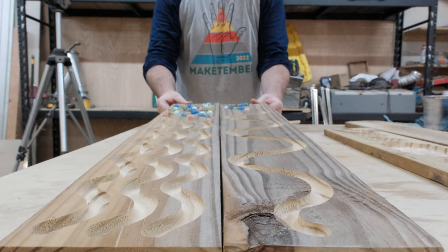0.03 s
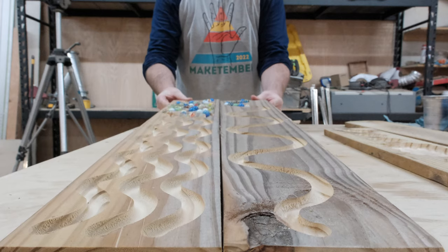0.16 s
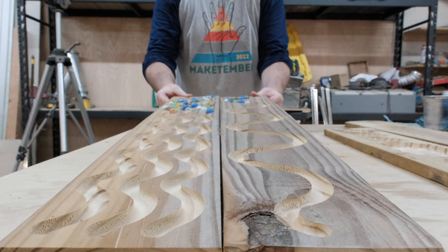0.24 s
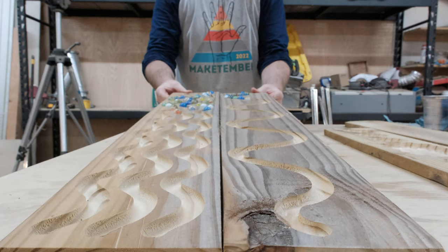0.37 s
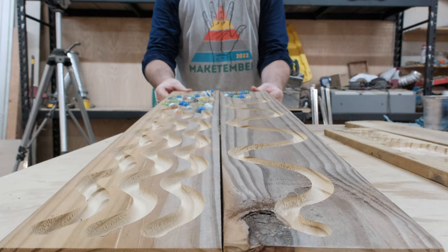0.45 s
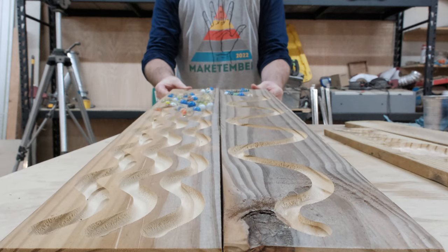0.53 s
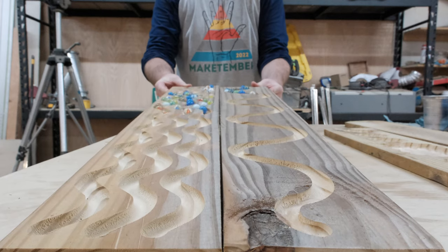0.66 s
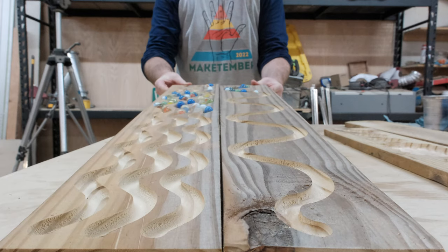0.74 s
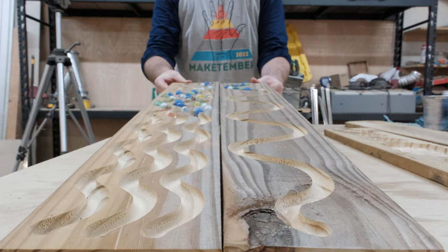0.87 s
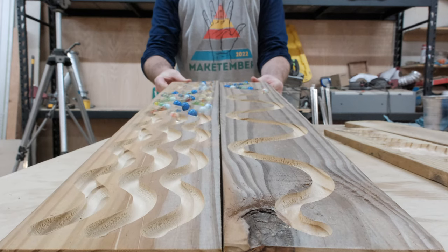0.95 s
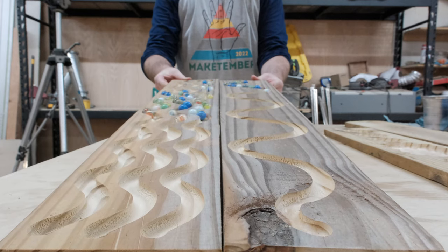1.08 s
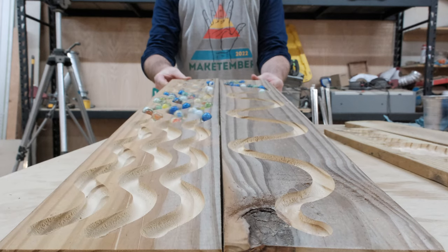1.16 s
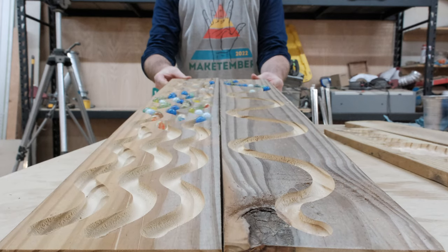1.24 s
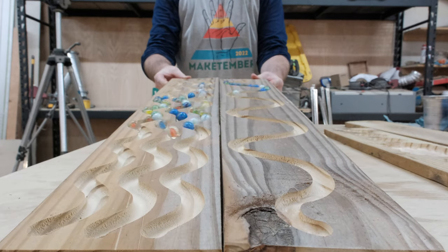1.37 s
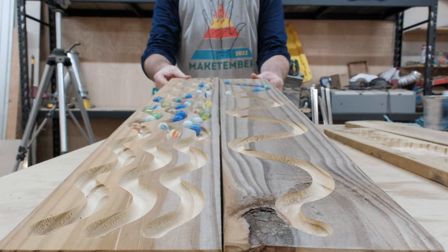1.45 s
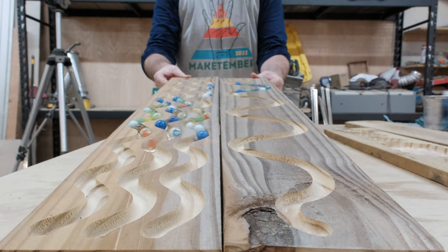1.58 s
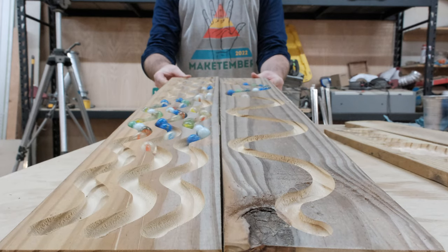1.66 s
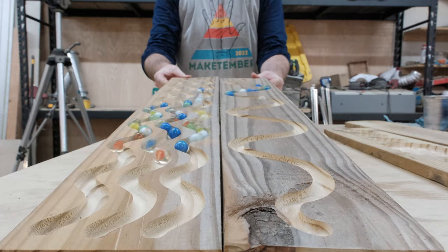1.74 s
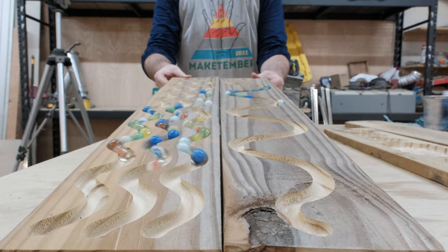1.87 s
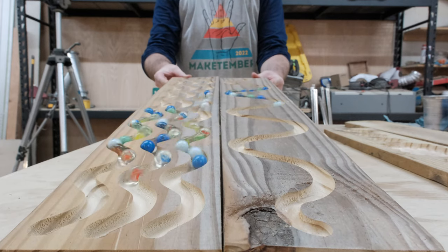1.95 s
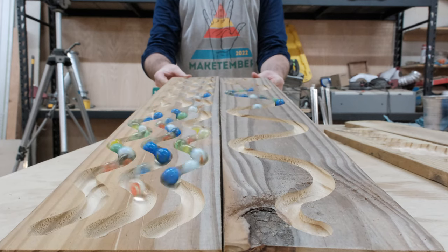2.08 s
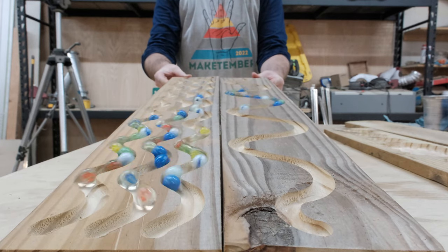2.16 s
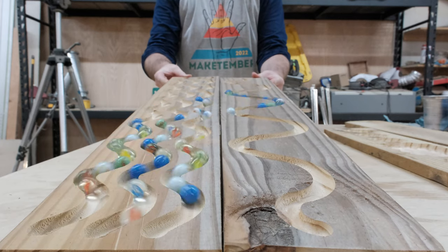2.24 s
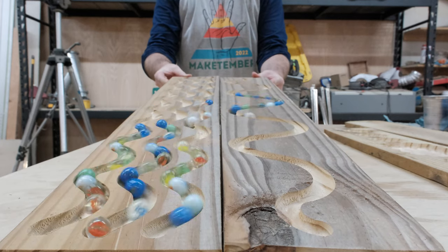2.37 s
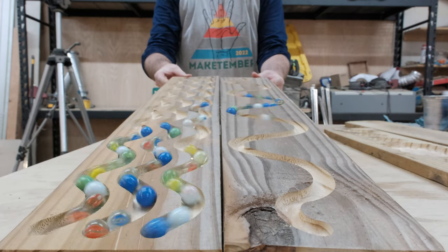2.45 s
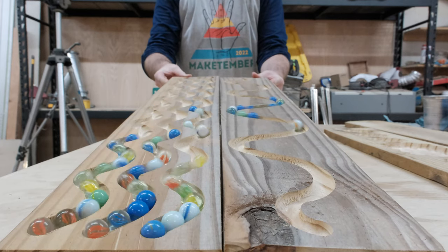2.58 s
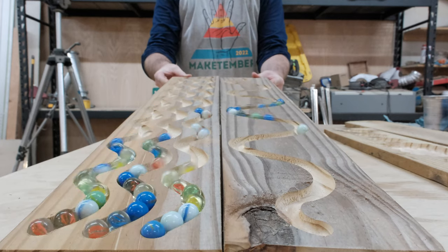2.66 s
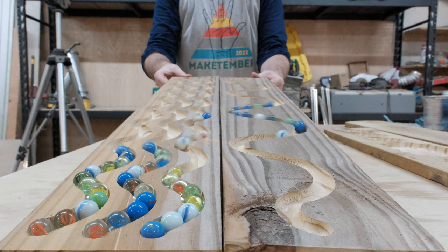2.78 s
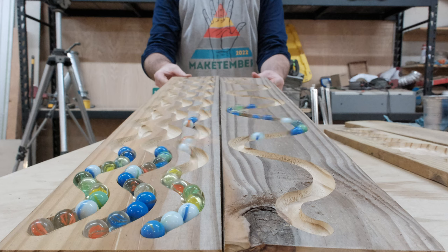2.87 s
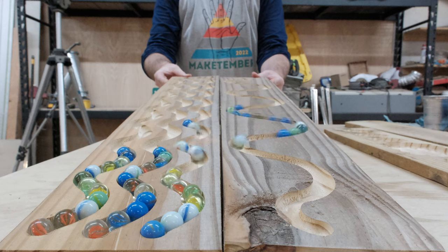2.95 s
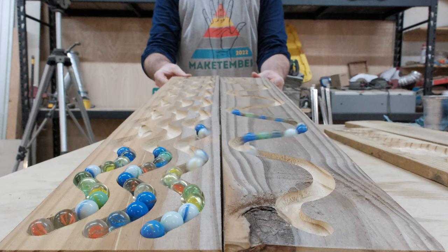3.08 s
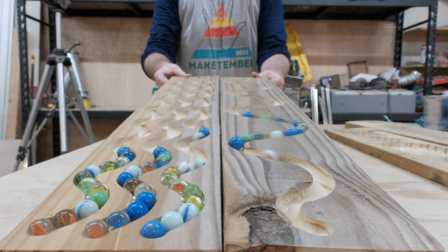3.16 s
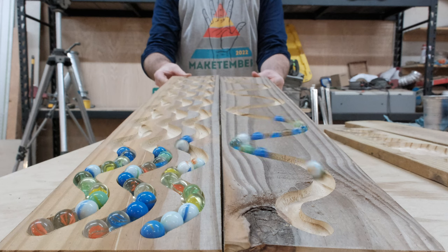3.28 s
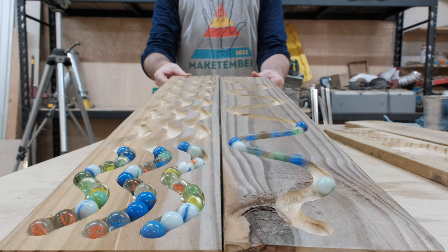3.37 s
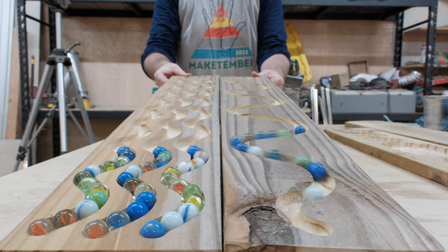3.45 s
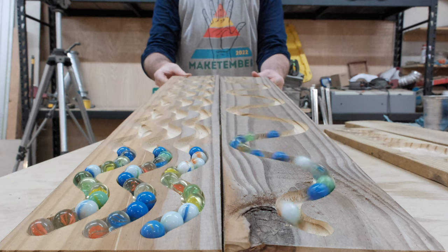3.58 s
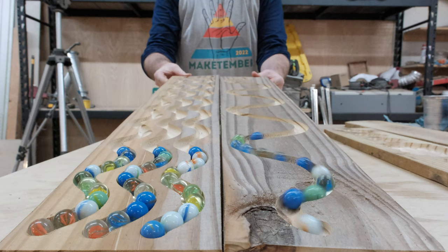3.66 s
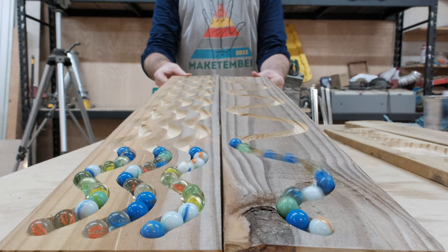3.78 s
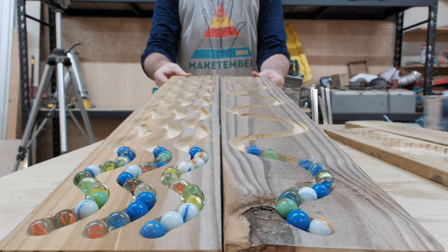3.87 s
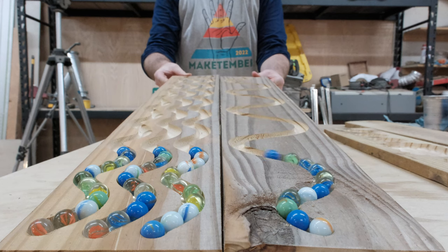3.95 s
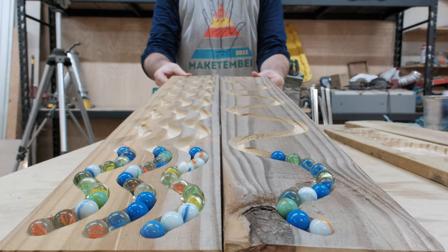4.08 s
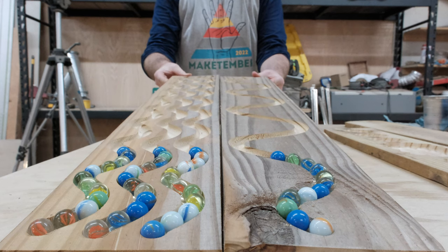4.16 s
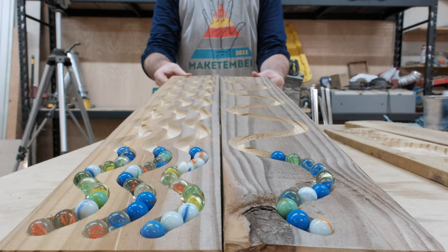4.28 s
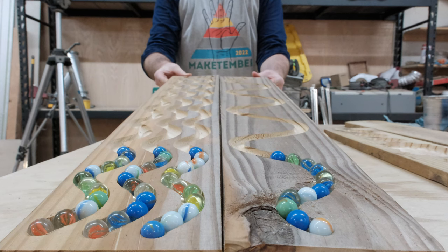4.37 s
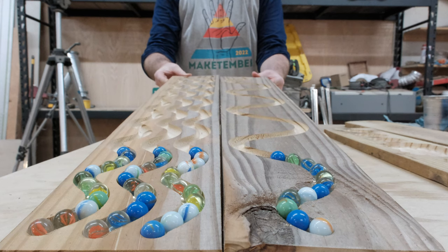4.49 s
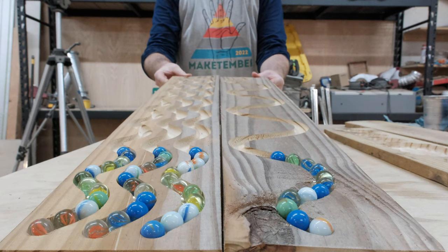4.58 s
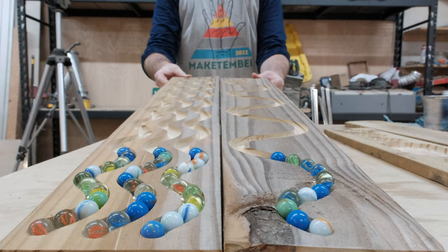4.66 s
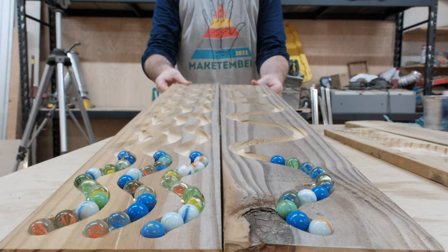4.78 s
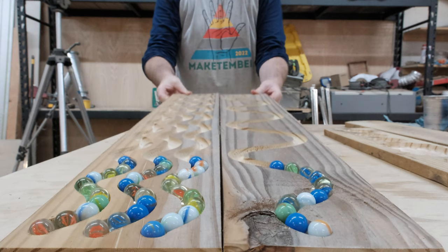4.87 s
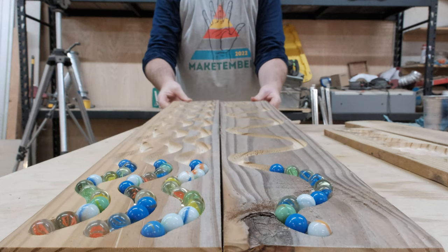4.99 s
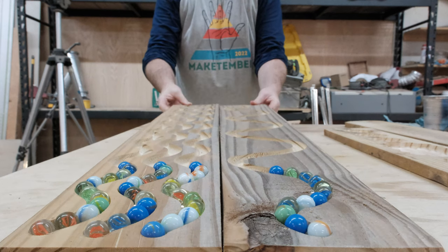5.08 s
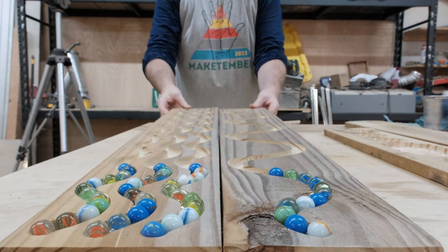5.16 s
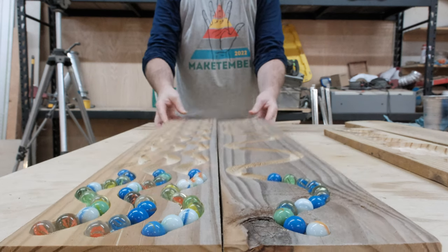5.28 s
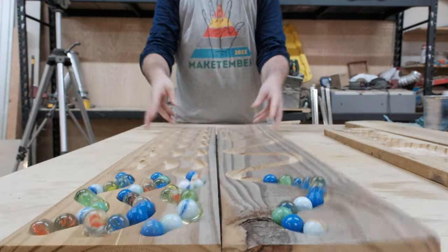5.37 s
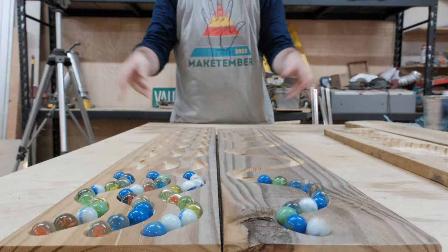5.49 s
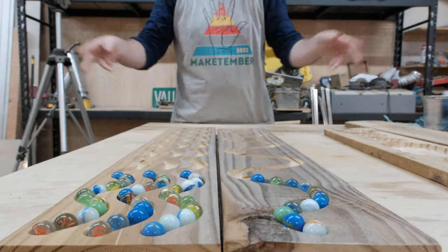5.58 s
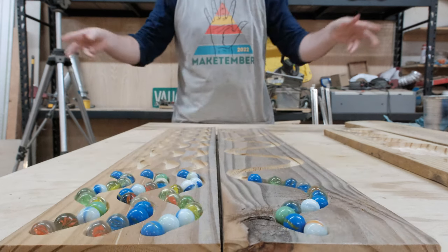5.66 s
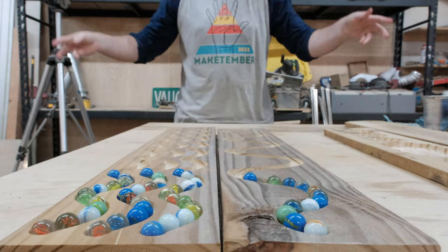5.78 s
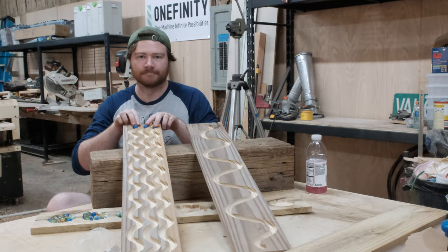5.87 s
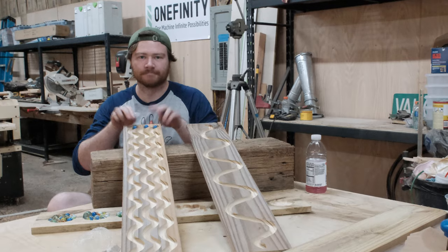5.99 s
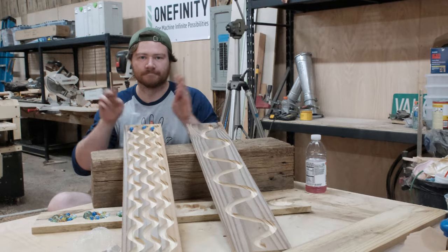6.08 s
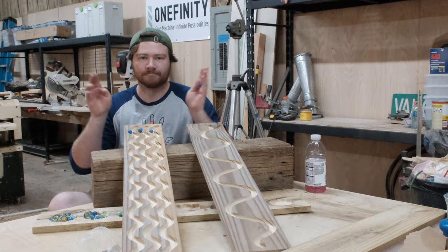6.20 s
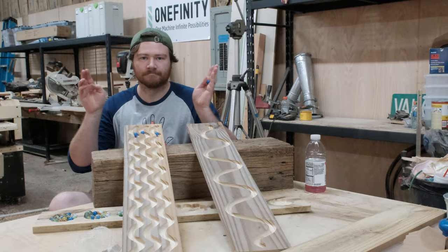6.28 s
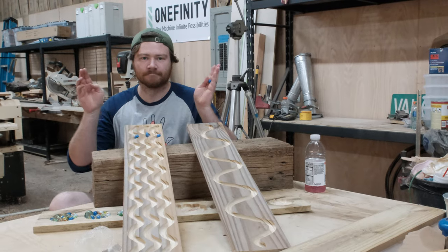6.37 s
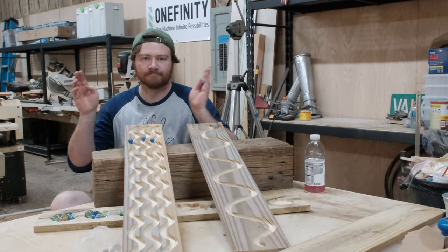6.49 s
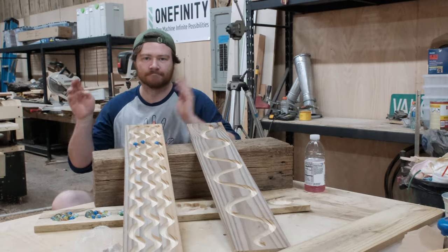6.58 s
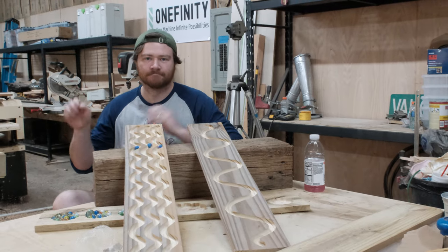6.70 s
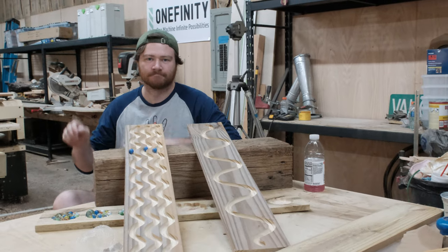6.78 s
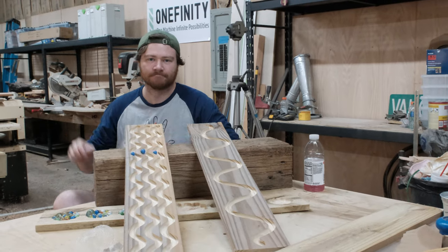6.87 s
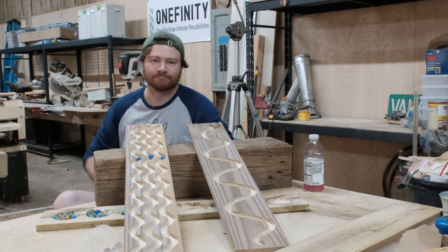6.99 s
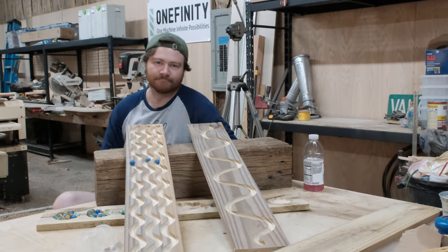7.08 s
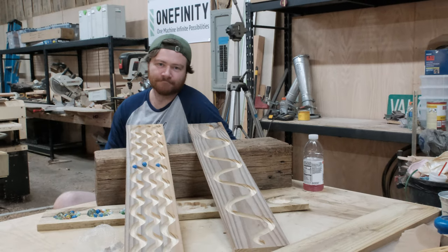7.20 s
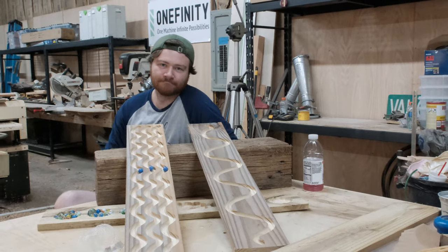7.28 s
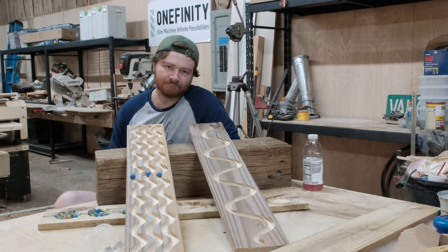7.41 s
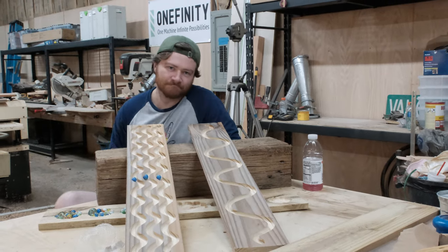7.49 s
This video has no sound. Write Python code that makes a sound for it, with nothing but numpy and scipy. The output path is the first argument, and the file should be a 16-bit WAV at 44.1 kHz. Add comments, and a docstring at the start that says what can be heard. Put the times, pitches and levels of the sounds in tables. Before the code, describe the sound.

Glass marbles rattle down grooved wooden boards and click into piles, the boards clack flat on a bench, then fainter marbles knock down another board.

```python
"""Quiet workshop: glass marbles roll down grooves of two tilted wooden boards close by, clicking as they pile up.
Hands shift the boards, which drop flat on the bench and shake the marbles; then a second scene:
three marbles knock their way down a board farther off. Board sound is noise and blows ringing wood modes;
clicks are short snaps with scatter; the drop is a board crack over decaying bench modes. Filtered noise and
thin tones form the background; decaying noise is the room's answer."""
import sys
import numpy as np
from scipy import signal
from scipy.fft import rfft, irfft, next_fast_len
from scipy.io import wavfile

SR = 44100
rng = np.random.default_rng(int(sys.argv[2]) if len(sys.argv) > 2 else 0)


def waveform_to_disk(signal):
    """Save audio, clipped to [-1, 1], as 16-bit WAV at the path in sys.argv[1]."""
    frames = np.transpose(np.atleast_2d(signal))
    scaled = np.clip(frames, -1, 1) * 32767
    samples = np.round(scaled).astype(np.int16)
    wavfile.write(sys.argv[1], SR, samples)


N = 332514

# rolling on the near boards: time_s, level_db
NEAR_ROLL = [(0, -41), (.13, -35), (.48, -23.5), (.66, -21.5), (.9, -25), (1.25, -18), (1.55, -17.5),
             (1.8, -13.5), (2.0, -15), (2.3, -19.5), (2.52, -26), (2.63, -20.5), (2.78, -29), (3.05, -20.5),
             (3.23, -27), (3.45, -21), (3.6, -23), (3.75, -22.5), (3.87, -30.5), (3.94, -37.5),
             (4.005, -32.5), (4.03, -65.5)]
# rolling on the far board: time_s, level_db
FAR_ROLL = [(5.9, -76), (6.146, -43.5), (6.332, -41.5), (6.716, -40.5), (6.886, -38), (7.046, -39),
            (7.54, -34)]
# knocks on the near boards: marbles while tilted, then the boards' landing and the shaken marbles:
# start_s, level_db (before lift), hardness_db (treble)
NEAR_KNOCKS = [(0.0959, -16.5, -33), (0.245, -8, -21), (0.304, -15, -22), (0.35, -12, -26),
               (0.4114, -12, 6), (0.456, -10.5, -33), (0.495, -11.5, 0), (0.571, -10, -14.5),
               (0.587, -7.5, -15.5), (0.6707, -8.5, -16), (0.6967, -11.5, -18.5), (0.7114, -10.5, -26),
               (0.776, -8, -19), (0.843, -12, -22), (0.9271, -13.5, -8), (0.9442, -11, -9),
               (0.9535, -8.5, -19.5), (0.9993, -12.5, -14), (1.1098, -11, -6), (1.087, -9, -19),
               (1.1368, -5.5, -10), (1.1979, -13, -8.5), (1.2389, -6, -13), (1.3187, -7, -17.5),
               (1.3481, -13, -5), (1.4911, -15.5, -12.5), (1.5715, -7.5, -11), (1.6018, -9, -9.5),
               (1.626, -5, -18.5), (1.718, -3, -21.5), (1.8145, -15.5, -14.5), (1.873, -11, -7.5),
               (2.0573, -5, -15), (2.1762, -6.5, -22.5), (2.2556, -8.5, -26.5), (2.366, -0.5, -18.5),
               (2.3952, -12.5, -16.5), (2.4878, -7, -11.5), (2.4978, -3, 4.5), (2.8667, -15, -12),
               (2.906, -14, -9), (2.932, -6.5, -17), (3.0147, -15, -19.5), (3.0477, -15, -22),
               (3.273, -10, -20.5), (3.336, -11, -7.5), (3.3613, -9.5, -5.5), (3.41, -21.5, -12),
               (3.457, -10, -20.5), (3.6448, -11, -9.5), (3.662, -8, -13), (3.7294, -4, -13.5),
               (3.7409, -7.5, -22.5), (3.8079, -9.5, -5.5), (3.821, -7, -1.5), (4.8913, -39.5, -49.5),
               (5.146, -38.5, -10), (5.3376, 0, -14.5), (5.348, -13, -24), (5.3972, -7, -5.5),
               (5.4274, -14, -4), (5.4503, -12.5, -8), (5.4826, -7.5, -17), (5.5206, -16, -4),
               (5.5752, -22, -13)]
# marbles knock far groove walls: start_s, level_db (before lift), hardness_db (treble)
FAR_KNOCKS = [(6.1484, -34, -18), (6.1892, -26.5, -21), (6.2315, -20.5, -18), (6.335, -19, -25),
              (6.3777, -19.5, -18), (6.407, -25.5, -14), (6.478, -27.5, -24), (6.545, -23, -27),
              (6.5655, -22, -18), (6.583, -25, -20), (6.6398, -19.5, -14), (6.6521, -15, -27),
              (6.694, -16, -17), (6.7073, -13, -25), (6.722, -17.5, -25), (6.7578, -20, 3),
              (6.786, -24, -24), (6.8619, -15.5, -26), (6.8926, -30, -23), (6.918, -25, -28),
              (6.9477, -27, -33), (6.9596, -15, -25), (6.968, -15, -14), (6.9877, -14.5, -27),
              (7.003, -15, -9), (7.045, -20.5, -28), (7.0653, -17.5, -12.5), (7.1104, -17.5, -22),
              (7.1269, -14.5, -5), (7.171, -25, -11), (7.241, -21, -17), (7.2838, -15, -25),
              (7.3112, -23.5, -26), (7.3219, -17, -13), (7.358, -15, 7), (7.375, -16, -7),
              (7.3902, -17, -11), (7.4535, -17, 4), (7.493, -19.5, -8)]
# glass meets glass: start_s (before a fixed offset), level_db (before trim)
GLASS_CLICKS = [(0.1446, -30), (0.177, -25), (0.186, -25.5), (0.2007, -26), (0.375, -28), (0.398, -28.5),
                (0.5302, -29), (0.5463, -21), (0.628, -22.5), (0.6973, -24), (0.8058, -20.5),
                (0.831, -22.5), (0.8869, -21.5), (0.9906, -26), (1.065, -15.5), (1.0972, -16),
                (1.1563, -13), (1.2502, -17), (1.265, -21.5), (1.368, -17), (1.387, -14), (1.4082, -20.5),
                (1.6663, -13.5), (1.7071, -11.5), (1.8078, -20), (1.8516, -12), (1.9298, -17.5),
                (2.0067, -13.5), (2.0352, -14), (2.0565, -14.5), (2.1136, -16), (2.4585, -15),
                (2.4687, -10), (2.4933, -8.5), (2.5434, -20), (2.56, -12), (2.5953, -8), (2.6174, -9.5),
                (2.632, -18), (2.649, -9), (2.654, -7.5), (2.6688, -13.5), (2.68, -5), (2.6887, -9),
                (2.7067, -8.5), (2.7205, -7), (2.7583, -9.5), (2.7917, -8), (2.814, -6), (2.8174, -11.5),
                (2.835, -10.5), (2.8868, -7), (2.9147, -15), (3.055, -23), (3.1423, 3), (3.1612, -19),
                (3.1716, -12), (3.481, -2), (3.4876, -5.5), (3.5444, -25.5), (3.5603, -20.5), (3.597, -14),
                (3.6185, -15), (3.7532, -17), (3.7727, -3.5), (3.785, -14), (3.812, -6), (3.8225, -3),
                (3.8505, -7), (3.8623, -6), (3.8687, -10.5), (3.8716, -13), (3.897, -6), (3.9078, -9.5),
                (3.9689, -1), (3.9933, -13), (4.013, -33), (5.3348, -14.5), (5.345, -19), (5.3994, -22),
                (5.4276, -18), (5.4944, -26), (5.5234, -36), (5.6127, -35), (5.6506, -43), (5.6735, -40),
                (5.6984, -39), (5.7473, -35), (5.827, -31)]
# modes of the tilted near boards: pitch_hz, width_hz, level_db
TILTED_MODES = [(153, 20, -2), (245, 32, -5), (557, 110, -2), (756.5, 55, 4.5), (913, 75, 2.5),
                (1050, 48, 4), (1187, 53, 8.5), (1307, 31, 5), (1531.4, 67, 9.5), (1910, 89, 4),
                (2006, 630, -4), (2420, 54, 0), (2928, 160, -11.5), (3250, 140, -19.5), (3734, 150, -43.5)]
# modes of the near boards damped by the bench: pitch_hz, width_hz, level_db
LYING_MODES = [(250, 120, -4), (600, 250, -4), (950, 350, -3), (1450, 450, 0), (2100, 500, -3),
               (3000, 700, -8), (4200, 1300, -16)]
# modes of the far board: pitch_hz, width_hz, level_db
FAR_MODES = [(238, 12.6, 8), (382, 11.3, 8), (500, 16, 7), (796, 52, 7.5), (1035.5, 8.3, 13.5),
             (1196, 21, 5.5), (1287, 54, 9), (1570, 76, 2.5), (1928, 64, 1), (2364, 186, -7),
             (2825, 175, -10.5), (3375, 70, -13), (3990, 200, -27), (6540, 900, -31.5)]
# marbles run into the queue: center_s, half_length_s, patter_db
PILE_UPS = [(2.65, 0.073, -28.5), (3.875, 0.044, -30), (3.997, 0.0074, -43)]
# bench modes: pitch_hz, level_db (before drop level), t60_s
BENCH_MODES = [(408, 12, 0.0096), (680, 18, 0.0044)]
# hands shift the boards: start_s, hold_s, fall_s (for about 9 dB), level_db
SCUFFS = [(4.825, .035, .015, -49), (5.15, .025, .035, -47), (5.288, .027, .005, -34)]
# room decay: frequency_hz, t60_s
ROOM_DECAY = [(200, 0.75), (1500, 0.73), (5000, 0.81), (12000, 0.21)]
# room noise spectrum: frequency_hz, density_db (relative, per Hz)
AIR_SPECTRUM = [(15, -37), (25, -6), (163, 1), (800, -4.5), (1600, -13.5), (14800, -25.5), (16500, -32.5)]
# tones of lamps and a fan: pitch_hz, level_db (rms)
HUM_TONES = [(452, -71.5), (872, -66), (1082, -74.5), (1680, -73.5), (6358, -82.5)]

# fingers put three marbles on the far board: start_s, level_db (before lift), hardness_db
SET_DOWN = (5.944, -35, -80)
# light knocks: level_db over the rolling (before lift), spread_db, softest hardness_db
RATTLE_NEAR = (2, 2, -25)
RATTLE_FAR = (4, 2.5, -31)
# rocking after the drop: start_s, hold_s, level_db
SHAKE = (5.39, 0.12, -24.5)
SHAKE_RISE_S, SHAKE_FALL_S = 0.043, 0.03  # for about 9 dB
SHAKE_PATTER_DB = -21  # glass contacts, relative to the rocking
# boards land: start_s, level_db
DROP_S, DROP_DB = (5.3372, 3)
# scene change: start_s, fade_in_s
CHANGE_S, FADE_IN_S = (5.862, 0.073)
# room noise in each scene: level_db (rms)
NEAR_AIR_DB, FAR_AIR_DB = [-60, -58.5]
# dry tap band: low_hz, high_hz
TAP_BAND_HZ = (1800, 4200)
TAP_FALL_S, TAP_DB_PER_HARDNESS_DB = 0.004, 0.4
CONTACT_HALF_S = 0.000079  # at reference hardness
FAR_SKID_S = 0.007  # short skids on the steep board
PATTER_DB, PATTER_POWER = -41.5, 0.57  # small glass contacts swing less than the rolling
SCUFF_RISE_S, SCUFF_RUB_DB = 0.011, -5.5  # rise for about 9 dB; rub relative to scuff gain
GLASS_ROOM_DB = -31
TOP_HZ = 16300


def rolling(modes, rate_hz, smooth_db, soft_hz):
    """Tool marks jolt marbles over a smooth rumble; each jolt shares out anew among the wood modes."""
    out = 0
    marks = unit(bumps(rate_hz, spread_db=1.5))
    for hz, width_hz, db in modes:
        # heavy low modes feel mostly the rumble
        drive = min(hz / 1500, 1) * marks + amp(smooth_db)
        jolts = drive * rng.standard_normal(N)
        pole = np.exp((-np.pi * width_hz + 2j * np.pi * hz) / SR)
        ring = unit(signal.lfilter([1], [1, -pole], jolts).imag)
        out = out + amp(db) * np.sqrt(width_hz) * ring
    # wood yields under glass: contact too slow for the treble
    return unit(filtered(out, lambda hz: 1 / (1 + 1j * hz / soft_hz) ** 2))


def knocks(events, modes, lift_db, soft_db, skid_s, skid_db, tap_db):
    """A blow and short skid ring the board over a dry tap; harder contact is briefer and favors high modes."""
    out = np.zeros(N)
    t = np.arange(SR // 14) / SR
    skid_t = t[:SR // 40]
    hz, width_hz, level_db = np.transpose(modes)[..., None]
    octaves = np.log2(hz / 1400)
    fades = width_hz * np.exp(-np.pi * width_hz * t)
    spots = rng.standard_normal((len(events), 3, len(modes), 1))
    skids = rng.standard_normal((len(events), SR // 40))
    tap_filter = signal.butter(5, TAP_BAND_HZ, "band", fs=SR, output="sos")
    taps = signal.sosfilt(tap_filter, skids[:, ::-1] * np.exp(-skid_t / TAP_FALL_S))
    for (s, db, hardness_db), (spot, side, load), jolts, tap in zip(events, spots, skids, taps):
        hard_db = hardness_db - soft_db
        treble_db = 0.71 * hard_db * np.clip(octaves, 0, 1)
        bass_db = np.clip(1.6 * hard_db, 0, 9) * np.clip(octaves, -3, 0)
        # marbles on the board shift its modes a little
        rings = fades * np.sin(2 * np.pi * hz * (1 + 0.015 * load) * t)
        strengths = np.sign(side) * amp(level_db + 3.5 * spot + treble_db + bass_db)
        ring = np.sum(strengths * rings, axis=0)
        contact_t = np.arange(-15, 16) / SR
        contact = np.exp(-(contact_t / CONTACT_HALF_S * amp(0.12 * hard_db)) ** 2)
        force = np.append(1, amp(skid_db) * jolts * np.exp(-skid_t / skid_s))
        ring = signal.fftconvolve(ring, np.convolve(force, contact))
        tap_gain = amp(db + tap_db + TAP_DB_PER_HARDNESS_DB * hard_db)
        add(out, s, amp(db + lift_db) * ring / np.max(np.abs(ring)))
        add(out, s, tap_gain * tap / np.max(np.abs(tap)))
    return out


def rattle(roll, over_db, spread_db, soft_db, count):
    """Light knocks at chance moments follow the rolling level, mostly small."""
    s, db = np.transpose(roll)
    draw = rng.random((count, 3))
    when_s = s[0] + draw[:, 0] * (s[-1] - s[0])
    extra_db = over_db - spread_db * np.log(draw[:, 1] + 0.038)
    level_db = np.interp(when_s, s, db) + extra_db
    return list(zip(when_s, level_db, soft_db + 9 * draw[:, 2]))


def radiated(x, edge_hz):
    """A narrow board pushes little air in the bass."""
    return filtered(x, lambda hz: (1j * hz / (1j * hz + edge_hz)) ** 3)


def tilted_boards(roll, scuffs):
    """Rolling, scuffs and knocks ring the near boards before they land."""
    sound = (roll + scuffs) * rolling(TILTED_MODES, 200, smooth_db=-4.0, soft_hz=5925)
    blows = [k for k in NEAR_KNOCKS if k[0] < DROP_S - 0.01]
    blows += rattle(NEAR_ROLL, *RATTLE_NEAR, count=200)
    sound = sound + knocks(blows, TILTED_MODES, lift_db=1.52, soft_db=-32,
                           skid_s=0.0073, skid_db=-25.5, tap_db=-18.5)
    return radiated(sound, edge_hz=228)


def lying_boards(shake):
    """The landing crack, rocking marbles and their knocks ring the near boards, damped by the bench."""
    sound = shake * rolling(LYING_MODES, 300, smooth_db=-8, soft_hz=3440)
    blows = [k for k in NEAR_KNOCKS if k[0] > DROP_S - 0.01]
    sound = sound + knocks(blows, LYING_MODES, lift_db=3.5, soft_db=-18,
                           skid_s=0.0077, skid_db=-16.5, tap_db=-22)
    return radiated(sound, edge_hz=85)


def click(hz, echoes, weight):
    """Air squeezed between marbles snaps and scatters; a heavy blow (weight 0-1) fills in a lower body."""
    t = np.arange(-20, 20) / SR
    snap = np.exp(-(t / 0.00018) ** 2) * np.sin(2 * np.pi * hz * t)
    edge = 0.42 * np.exp(-(t / 0.00009) ** 2) * np.sin(2 * np.pi * 12000 * t)
    # marbles shoved into the wood
    body = 0.84 * weight * np.exp(-(t / 0.00016) ** 2) * np.sin(2 * np.pi * 3800 * t)
    # returned by the wood and the next marbles
    scatter = 0.066 * echoes * np.exp(-np.arange(len(echoes)) / SR / 0.002)
    return np.convolve(snap + edge + body, np.append(1, scatter))


def glass(patter, crowd):
    """Clear clicks at individual pitches over small contacts that thicken where marbles crowd."""
    out = np.zeros(N)
    pitches_hz = rng.normal(7270, 500, len(GLASS_CLICKS))
    echoes = rng.standard_normal((len(GLASS_CLICKS), 500))
    for (s, db), hz, echo in zip(GLASS_CLICKS, pitches_hz, echoes):
        weight = np.clip(1 + db / 40, 0, 1)
        add(out, s + 0.00052, amp(db - 2.0) * click(hz, echo, weight))

    def small(rate_hz, weight):
        """Random contacts excite four click shapes."""
        total = 0
        for hz, echo in zip(pitches_hz[:4], echoes):
            contacts = bumps(rate_hz, spread_db=4.5)
            total = total + signal.fftconvolve(contacts, click(hz, echo, weight))[:N]
        return unit(total)

    return out + patter * small(25, 0.1) + crowd * small(200, 0.6)


def drop():
    """Boards slam flat: a short ring of low bench modes."""
    out = np.zeros(N)
    t = np.arange(SR // 3) / SR
    thud = sum(amp(db - 60 * t / t60_s) * np.sin(2 * np.pi * hz * t) for hz, db, t60_s in BENCH_MODES)
    add(out, DROP_S, amp(DROP_DB) * thud * (1 - np.exp(-t / 0.0013)))
    return out


def rub():
    """Skin and wood slide on the bench: a dull rumble with a faint airy top."""
    def response(hz):
        """Low resonance plus weak low-passed noise."""
        low = 1j * hz * 90 / (150 ** 2 - hz ** 2 + 1j * hz * 90)
        return low + amp(-24.5) / (1 + 1j * hz / 5000)

    return unit(filtered(rng.standard_normal(N), response))


def near_view(t):
    """Near boards, marbles, drop and scuffs, with the room's answer."""
    roll = gains(NEAR_ROLL)
    shake = swell(*SHAKE, SHAKE_RISE_S, SHAKE_FALL_S)
    scuffs = sum(swell(s, hold_s, db, SCUFF_RISE_S, fall_s) for s, hold_s, fall_s, db in SCUFFS)
    scuffs = (t < DROP_S) * scuffs
    piles = sum(amp(db) * np.exp(-((t - s) / half_s) ** 2) for s, half_s, db in PILE_UPS)
    tilted = tilted_boards(roll, scuffs)
    lying = lying_boards(shake)
    patter = amp(PATTER_DB) * roll ** PATTER_POWER
    marbles = glass(patter, piles + amp(SHAKE_PATTER_DB) * shake)
    thud = drop()
    # tilted boards face the listener; lying boards sound into the room
    to_room = amp(-24.5) * tilted + amp(-13.5) * lying
    to_room = to_room + amp(GLASS_ROOM_DB) * marbles + amp(-23.0) * thud
    direct = tilted + lying + marbles + thud + amp(SCUFF_RUB_DB) * scuffs * rub()
    return direct + workshop(to_room)


def far_view():
    """Three marbles roll and knock on the far board, with the room's answer."""
    sound = gains(FAR_ROLL) * rolling(FAR_MODES, 80, smooth_db=-4, soft_hz=2500)
    blows = [SET_DOWN] + FAR_KNOCKS + rattle(FAR_ROLL, *RATTLE_FAR, count=50)
    sound = sound + knocks(blows, FAR_MODES, lift_db=1.53, soft_db=-29.5,
                           skid_s=FAR_SKID_S, skid_db=-22.5, tap_db=-24.5)
    sound = radiated(sound, edge_hz=124)
    return sound + amp(-15) * workshop(sound)


def workshop(x):
    """Room answer: noise whose frequencies each decay at their own speed."""
    hz, t, z = signal.stft(rng.standard_normal(SR), SR, nperseg=256)
    decay = amp(-60 * t / along(ROOM_DECAY, hz)[:, None])
    tail = signal.istft(z * decay, SR, nperseg=256)[1]
    delayed = np.pad(x, (400, 0))  # samples
    return signal.fftconvolve(delayed, tail / np.linalg.norm(tail))[:N]


def air(t):
    """Steady filtered noise in both scenes; thin tones with wandering phase in the first."""
    noise = unit(filtered(rng.standard_normal(N), lambda hz: amp(along(AIR_SPECTRUM, hz))))
    drift = np.cumsum(rng.standard_normal((len(HUM_TONES), N)), axis=1) * 0.0078  # rad
    hum = 0
    for (hz, db), phase in zip(HUM_TONES, drift):
        hum = hum + np.sqrt(2) * amp(db) * np.sin(2 * np.pi * hz * t + phase)
    return amp(NEAR_AIR_DB) * noise + hum, amp(FAR_AIR_DB) * noise


def bumps(rate_hz, spread_db):
    """Random impulses, mostly small and a few large."""
    draw = rng.random((3, N))
    sizes = amp(-spread_db * np.log(draw[2] + 1e-4))
    return (draw[0] < rate_hz / SR) * np.sign(draw[1] - 0.5) * sizes


def swell(start_s, hold_s, db, rise_s, fall_s):
    """Gain climbs to db at start_s, holds and dies away exponentially."""
    t = np.arange(N) / SR - start_s
    return amp(db) * np.exp(np.minimum(t, 0) / rise_s - np.maximum(t - hold_s, 0) / fall_s)


def gains(rows):
    """Gain per sample of a (time_s, level_db) curve, -200 dB outside it."""
    s, db = np.transpose(rows)
    return amp(np.interp(np.arange(N) / SR, s, db, -200, -200))


def along(points, hz):
    """Interpolates (frequency_hz, value) points on a log frequency axis."""
    f, v = np.transpose(points)
    return np.interp(np.log(hz + 1), np.log(f + 1), v)


def filtered(x, response):
    """Applies a complex frequency response with zero padding."""
    m = next_fast_len(N + SR // 2)
    return irfft(rfft(x, m) * response(np.fft.rfftfreq(m, 1 / SR)), m)[..., :N]


def add(out, start_s, sound):
    """Mixes in a short sound at start_s."""
    part = out[round(start_s * SR):][:len(sound)]
    part += sound[:len(part)]


def unit(x):
    """Scales x to rms 1."""
    return x / np.sqrt(np.mean(x ** 2) + 1e-20)


def amp(db):
    """Gain of a level in dB."""
    return 10 ** (np.asarray(db) / 20)


def scene():
    """Near scene stops abruptly; the far scene fades in from that moment."""
    t = np.arange(N) / SR
    near_air, far_air = air(t)
    near = near_view(t) + near_air
    far = far_view() + far_air
    fade_in = np.clip((t - CHANGE_S) / FADE_IN_S, 0, 1)
    return (near * (t < CHANGE_S) + far * fade_in)[None]


def record(dry):
    """Microphone thins the bass, flattens peaks toward full scale and steeply limits the treble."""
    bass_cut = signal.butter(2, 85, "high", fs=SR, output="sos")
    thin = signal.sosfilt(bass_cut, dry)
    held = thin / (1 + np.abs(thin) ** 8) ** (1 / 8)
    limited = filtered(held, lambda hz: 1 / (1 + (hz / TOP_HZ) ** 120))
    return np.clip(limited, -1, 1)


dry = scene()
out = record(dry)
waveform_to_disk(out)
```